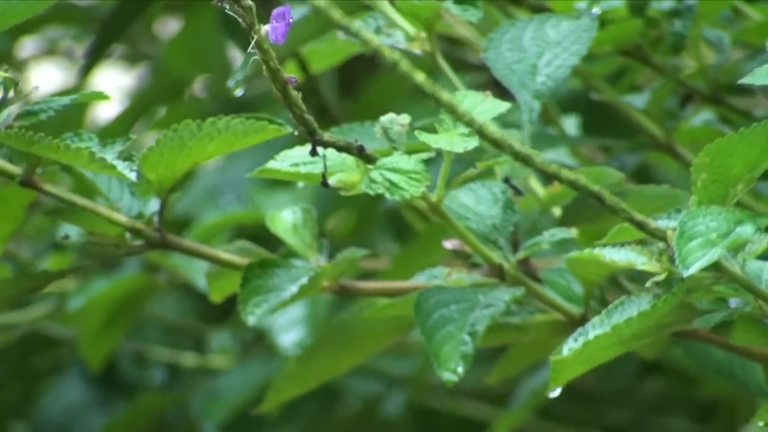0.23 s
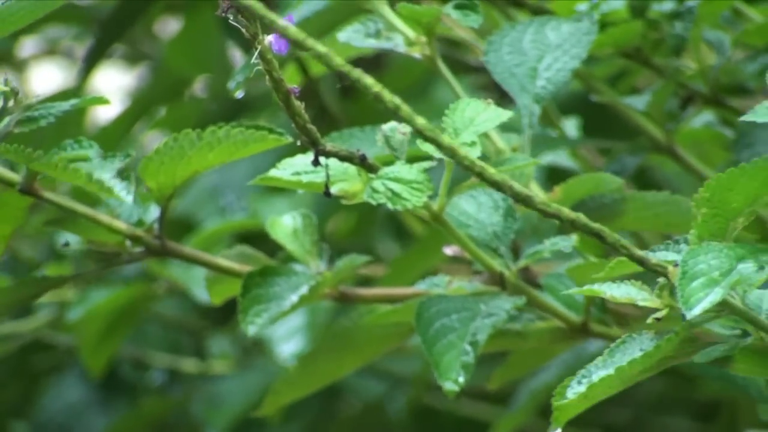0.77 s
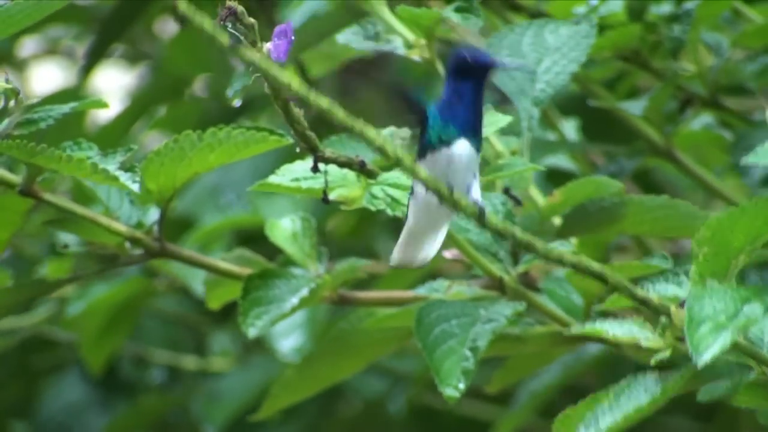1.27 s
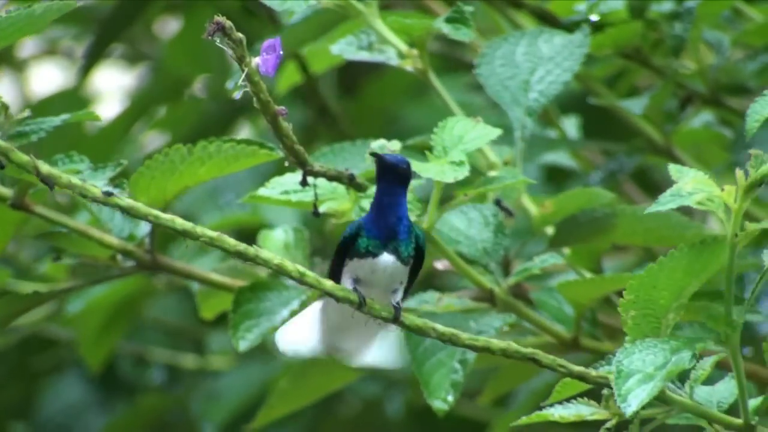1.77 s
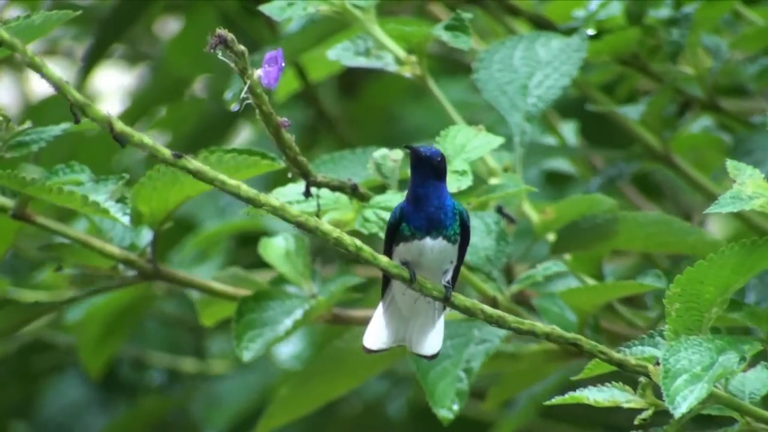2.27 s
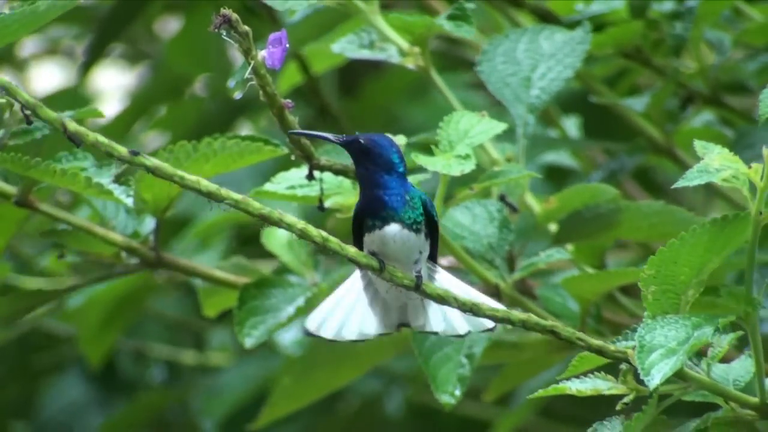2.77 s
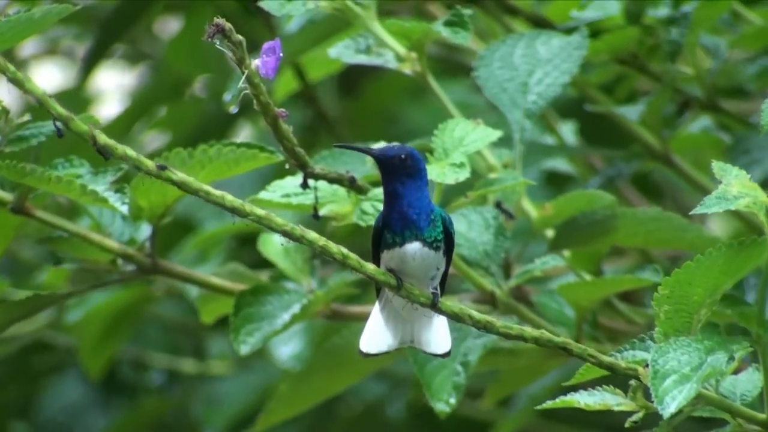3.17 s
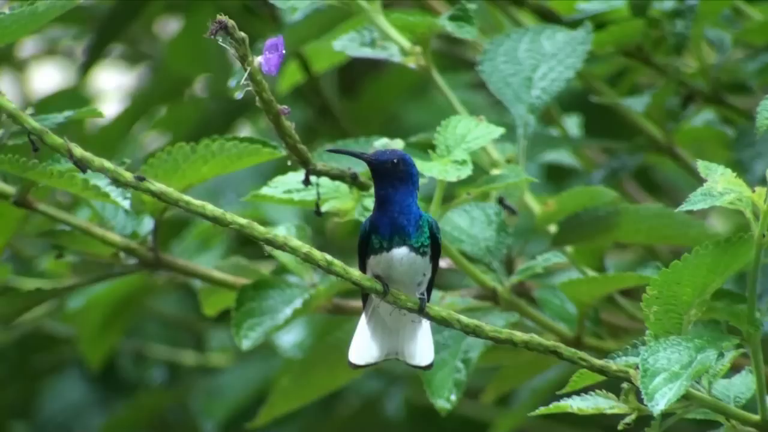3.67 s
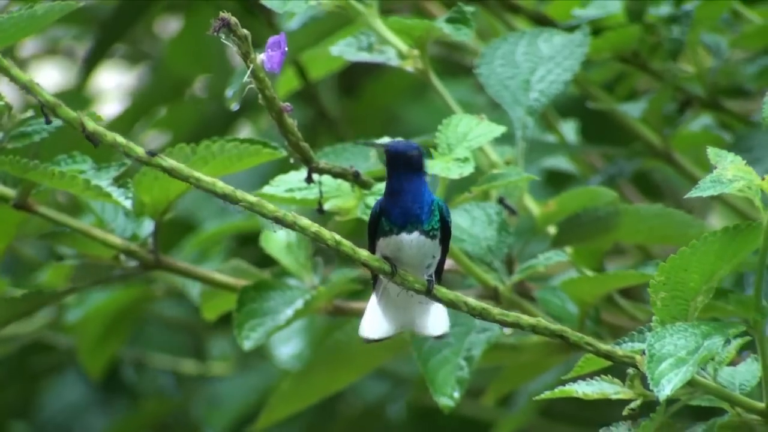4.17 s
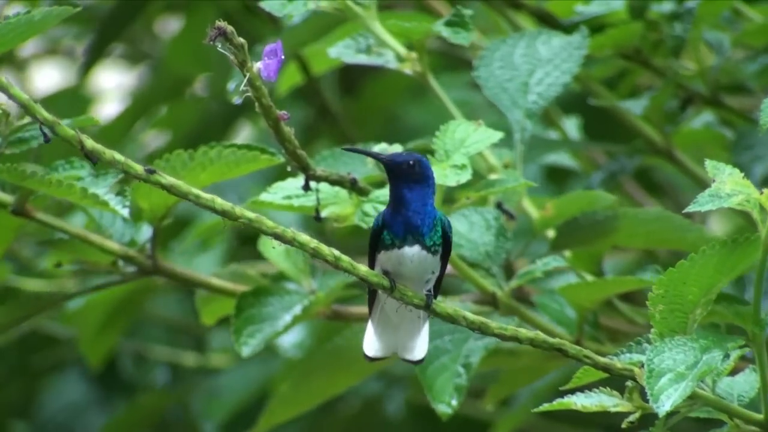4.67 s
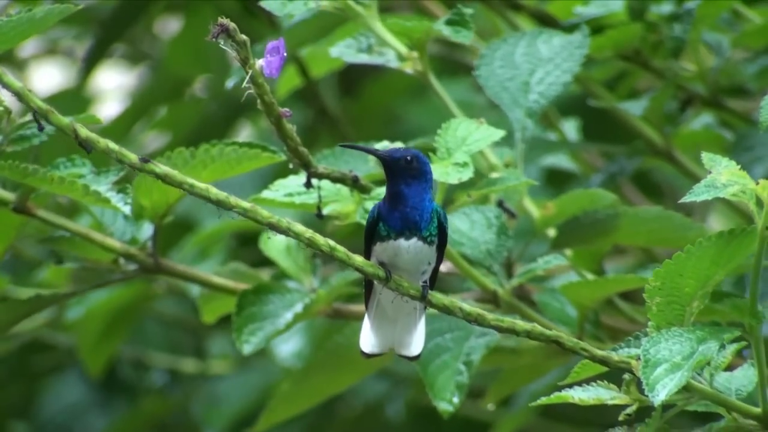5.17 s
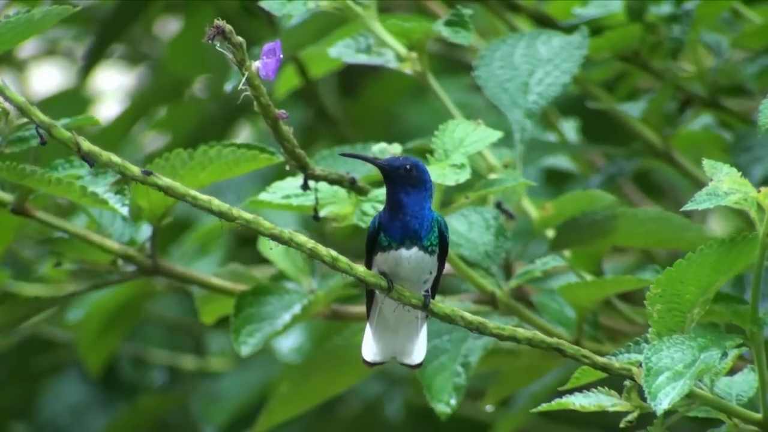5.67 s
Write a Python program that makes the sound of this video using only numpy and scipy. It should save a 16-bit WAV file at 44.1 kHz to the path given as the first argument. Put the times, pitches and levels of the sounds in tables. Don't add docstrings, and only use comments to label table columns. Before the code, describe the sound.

Constant soft rainfall on forest foliage, scattered drop snaps, and occasional short echoing bird whistles over faint distant chirps and thin high seeps.

```python
import sys
import numpy as np
from scipy import signal
from scipy.fft import rfft, irfft, next_fast_len
from scipy.io import wavfile
from scipy.ndimage import uniform_filter1d

SR = 44100
rng = np.random.default_rng(int(sys.argv[2]) if len(sys.argv) > 2 else 0)


def pcm_store(signal):
    levels = np.round(np.clip(np.atleast_2d(signal), -1, 1) * 32767)
    wavfile.write(sys.argv[1], SR, levels.astype(np.int16).T)


def to_linear_factor(level_db):
    exponent = np.asarray(level_db, float) / 20
    return 10 ** exponent


N = 261513

# time_s, body_db, brightness_db (top against body)
SHOWER = [
    (0.0, -44.5, -1.5),
    (0.31, -46, 0),
    (1.68, -46.5, 0),
    (1.9, -46, 0),
    (2.33, -46.5, 0),
    (2.97, -46, 0.5),
    (3.6, -46.5, 1),
    (5.73, -47, 1),
    (5.93, -48.5, 1),
]
# frequency_hz, level_db (per Hz)
RAIN_SPECTRUM = [(210, -47), (350, -11.5), (1210, -0.5), (3130, -0.5), (3720, -5), (5720, -9),
                 (6290, -13.5), (7030, -11), (13300, -31), (15500, -37)]
# frequency_hz, level_db (per Hz)
RUMBLE_SPECTRUM = [(15, -45), (25, -23), (45, -15), (68, -4), (82, -6.5), (125, -3), (200, -2.5), (300, -2),
                   (420, -8), (600, -16), (990, -90)]
# start_s, length_s, level_db
SLURS = [(.002, .06, -52), (.2, .07, -55), (.3, .1, -53), (1.695, .08, -53), (2.99, .065, -54),
         (3.3, .09, -52), (4.475, .09, -51), (4.705, .095, -51), (5.5, .055, -61)]
# start_s, length_s, from_hz, to_hz, level_db
NOTES = [
    (1.82, .06, 3350, 3650, -56),
    (3.697, .04, 5270, 5230, -53.5),
    (3.655, .015, 5050, 5050, -62),
    (4.862, .024, 3550, 3510, -53),
]
# start_s, centre_hz, width_octaves, strength_db
NEAR_DRIPS = [(.068, 14200, .3, -61), (1.112, 15000, .15, -81), (2.758, 3700, .11, -62),
              (4.325, 14300, .25, -81), (4.42, 14500, .2, -83), (4.548, 1200, .16, -65),
              (4.733, 1700, .14, -61), (5.596, 12600, .2, -74)]
# start_s, centre_hz, width_octaves, strength_db
MID_DRIPS = [(.018, 1440, .27, -41), (.621, 10000, 1.1, -56), (.764, 2700, .5, -43.5),
             (1.062, 11500, .7, -55), (1.84, 1630, .51, -38), (2.681, 600, .33, -58), (2.83, 5200, .1, -52),
             (2.875, 8400, .76, -47), (3.037, 6500, .46, -43), (3.037, 9900, .2, -59),
             (3.751, 895, .3, -54), (3.862, 12000, .7, -64), (3.912, 1560, .49, -35),
             (4.09, 10000, .55, -52), (4.561, 6000, .4, -56), (4.964, 3000, .12, -46),
             (5.001, 13500, .3, -67), (5.023, 1595, .17, -44.5), (5.292, 11500, .6, -61),
             (5.822, 4300, .98, -40.5), (.347, 11000, .8, -62), (.424, 11500, .35, -57),
             (1.772, 6500, .35, -52), (3.007, 1790, .18, -49), (3.173, 12500, .4, -64),
             (4.434, 171, .5, -68), (5.054, 7500, .51, -51), (5.207, 12000, .6, -52.5),
             (3.035, 13500, .45, -56)]
# start_s, centre_hz, width_octaves, strength_db
FAR_DRIPS = [(.004, 4800, .45, -46), (1.033, 1710, .6, -44), (1.335, 13200, .45, -57),
             (1.336, 4500, 1.01, -44), (1.659, 4480, .3, -47), (1.676, 8900, .5, -50),
             (1.745, 746, .18, -52.5), (2.305, 10500, .9, -58), (3.101, 2400, .22, -43),
             (3.26, 7460, .6, -49), (3.595, 8500, .54, -54), (4.488, 12500, .4, -67),
             (4.62, 1250, .64, -43.5), (5.265, 6500, .5, -51), (5.814, 11000, .7, -55)]
# start_s, length_s, from_hz, to_hz, level_db
PLOPS = [
    (.016, 0.024, 1504, 1425, -42.5),
    (3.003, .024, 1795, 1816, -43),
    (3.915, .035, 1385, 1860, -48),
    (4.628, 0.024, 1100, 1505, -46),
    (4.732, .02, 1650, 1750, -47),
    (2.68, 0.056, 592, 640, -58),
]
# centre_s, low_hz, high_hz, level_db
PUFFS = [(0.576, 8270.0, 10340.0, -66.6), (0.577, 13180.0, 14380.0, -81.1),
         (0.949, 10340.0, 11630.0, -75.4), (1.157, 5130, 6290.0, -55.2), (1.159, 10420.0, 11630.0, -75.2),
         (1.205, 12490.0, 13700.0, -81.2), (1.299, 5680.0, 6890.0, -60.6), (1.299, 9650.0, 10940.0, -73.3),
         (1.601, 5680.0, 6890.0, -60), (1.603, 9040.0, 10340.0, -68.8), (2.552, 4130.0, 5140, -56),
         (2.971, 5680.0, 6890.0, -62.6), (3.061, 13870.0, 15070.0, -77.6), (4.04, 11110.0, 13010.0, -76.3)]
# start_s, length_s, from_hz, to_hz, level_db
SEEPS = [(.95, .08, 8300, 8620, -62), (1.075, .11, 8550, 8450, -64), (2.29, .07, 8700, 8500, -61),
         (2.38, .07, 8600, 8400, -69), (3.73, .06, 8550, 8400, -65), (4.905, .03, 8500, 8500, -59),
         (5.06, .06, 8500, 8400, -64)]
# climb_start_s, crest_s, fall_s, crest_hz, level_db
WHISTLES = [
    (1.817, .056, .085, 2770, -38),
    (4.928, .078, .015, 2770, -36),
    (5.477, .052, .09, 2660, -35.5),
]
# time_s, pitch_hz, level_db
CHIP = [
    (4.883, 3450, -46),
    (4.893, 4450, -44.5),
    (4.905, 5510, -44.5),
    (4.914, 6150, -50),
]
# centre_hz, width_hz, depth_db
HOUSING = [(5100, 104, -1.5), (7680, 240, -2.5), (10940, 390, -2), (12550, 320, -1.5), (14100, 500, -1.5)]

RUMBLE_DB, CUTOFF_HZ = -66.3, 15690
SLUR_FROM_HZ, SLUR_TO_HZ = 3040, 3640
NEAR_SNAP_DB, MID_SNAP_DB, FAR_SNAP_DB = 27, 13.6, 1.5
NEAR_TAIL_S, MID_TAIL_S, FAR_TAIL_S = .3, .53, .56
TAIL_KNEE_DB, TAIL_LOSS_S_PER_DB, SNAP_LOSS = -47, .028, .55
NOTE_WOBBLE_HZ, SEEP_WOBBLE_HZ, WHISTLE_WOBBLE_HZ = 38, 130, 24
LEAD_S, LEAD_FROM_HZ, LEAD_TO_HZ = .04, 2220, 2320
CLIMB_S, CLIMB_TO_HZ, FALL_HZ_PER_S = .044, 2640, 8800
LEAD_DB, CLIMB_DB, ARRIVE_DB, CREST_DB, FALL_DB, END_DB = -11, -5.5, -1.5, 1.6, -2.6, -7.5


def rms_one(x):
    return x / np.sqrt(np.mean(x ** 2) + 1e-20)


def at_hz(points, hz):
    point_hz, point_db = np.array(points).T
    return np.interp(np.log(hz + 1), np.log(point_hz), point_db)


def drift(rate_hz):
    r = np.exp(-80 * np.pi * rate_hz / SR)
    chance = rng.standard_normal(N // 40 + 2002)
    slow = signal.lfilter([1], [1, -2 * r, r * r], chance)[2000:]
    return np.interp(np.arange(N) / 40, np.arange(len(slow)), rms_one(slow))


def coloured(x, spectrum):
    gain = to_linear_factor(at_hz(spectrum, np.fft.rfftfreq(len(x), 1 / SR)))
    return rms_one(irfft(rfft(x) * gain, len(x)))


def scattered(length, t60, build_s):
    t = np.arange(length) / SR
    build = 1 - np.exp(-t / max(build_s, 1e-4))
    return rng.standard_normal(length) * build * to_linear_factor(-60 * t / max(t60, .02))


def drop_sizes(count, spread_db):
    return to_linear_factor(spread_db * np.minimum(rng.exponential(1, count), 4)) * rng.choice([-1, 1], count)


def rain(patchy_db, gust_db, ticks_per_s, tick_db, spread_db):
    time_s, *levels = np.transpose(SHOWER)
    body_db, bright_db = (np.interp(np.arange(N) / SR, time_s, level) for level in levels)
    size = next_fast_len(N)
    ticks = drop_sizes(size, spread_db) * (rng.random(size) < ticks_per_s / SR)
    leaf = np.r_[1, .05 * scattered(4096, .15, .004)]
    ticks = rms_one(signal.fftconvolve(ticks, leaf)[:size])
    treble = signal.butter(1, 6000, "high", fs=SR, output="sos")
    bright = signal.sosfilt(treble, ticks)
    wide = rfft(coloured(rng.standard_normal(size) + to_linear_factor(tick_db) * bright, RAIN_SPECTRUM))
    octave = np.log2(np.fft.rfftfreq(size, 1 / SR) / 500 + 1e-9)
    gust = drift(8.0)
    out = 0
    for k in range(11):
        share = np.clip(1 - np.abs(np.clip(2 * octave, 0, 10) - k), 0, 1)
        swell_db = k / 10 * (bright_db + gust_db * gust) + patchy_db * drift(14.0)
        out = out + to_linear_factor(swell_db) * irfft(wide * share, size)[:N]
    return to_linear_factor(body_db + 4.5) * out


def rumble():
    return to_linear_factor(RUMBLE_DB) * coloured(rng.standard_normal(next_fast_len(N)), RUMBLE_SPECTRUM)[:N]


def patter(per_s, cycles, spread_db, level_db):
    sizes = np.clip(drop_sizes(N, spread_db), -3.3, 3.3)
    born = rng.random(N) < per_s / SR
    dealt = rng.integers(0, 14, N)
    out = 0
    for k, hz in enumerate(np.geomspace(950, 4400, 14)):
        r, w = to_linear_factor(-60 * hz / (cycles * SR)), 2 * np.pi * hz / SR
        hits = sizes * born * (dealt == k) + 1e-18
        out = out + signal.lfilter([0, np.sin(w)], [1, -2 * r * np.cos(w), r * r], hits)
    thin = signal.butter(4, 500, "high", fs=SR, output="sos")
    return to_linear_factor(level_db) * rms_one(signal.sosfilt(thin, out))


def forest(x, wet_db, t60, build_s, echo_s, echo_db):
    answer = scattered(SR, t60, build_s)
    answer = to_linear_factor(wet_db) * answer / np.sqrt(np.sum(answer ** 2))
    answer[0] = 1
    trunks = np.round((echo_s + .004 * rng.standard_normal(3) * [0, 1, 1]) * SR).astype(int)
    answer[np.maximum(trunks, 1)] += to_linear_factor(echo_db - np.array([1.2, 8, 11]))
    return signal.fftconvolve(x, answer)[:N]


def sing(rows, overtone_db, wobble_hz):
    s, hz, level_db = np.transpose(rows)
    t = np.arange(s[0], s[-1], 1 / SR)
    smooth = lambda v: uniform_filter1d(v, size=300, mode="nearest")
    wobble = wobble_hz * rms_one(smooth(rng.standard_normal(SR // 2)))[:len(t)]
    phase = 2 * np.pi * np.cumsum(smooth(np.interp(t, s, hz)) + wobble) / SR
    tone = np.sin(phase) + to_linear_factor(overtone_db) * np.sin(2 * phase)
    ends = np.clip(np.minimum(t - s[0], s[-1] - t) / 0.004, 0, 1)
    level = to_linear_factor(smooth(np.interp(t, s, level_db)))
    out, at = np.zeros(N), round(s[0] * SR)
    out[at:at + len(t)] = np.sqrt(2) * ends * level * tone
    return out


def notes(table, wobble_hz):
    out = np.zeros(N)
    for s, length, from_hz, to_hz, db in table:
        bend = (s + .55 * length, from_hz + .7 * (to_hz - from_hz), db)
        out += sing([(s, from_hz, db), bend, (s + length, to_hz, db)], -22, wobble_hz)
    return out


def far_callers():
    slurs = [(s, length, SLUR_FROM_HZ, SLUR_TO_HZ, db) for s, length, db in SLURS]
    calls = to_linear_factor(1.6) * notes(NOTES + slurs, NOTE_WOBBLE_HZ)
    return forest(calls, wet_db=-2.5, t60=.6, build_s=.006, echo_s=.05, echo_db=-13)


def drips(table, snap_db, tail_s):
    out, size, lead = np.zeros(N + SR), SR // 2, 64
    slope = to_linear_factor(at_hz(RAIN_SPECTRUM, np.fft.rfftfreq(size, 1 / SR)))
    for s, hz, octaves, db in table:
        edges = np.clip(hz * 2 ** (np.array([-.5, .5]) * max(octaves, .05)), 50, .45 * SR)
        band = signal.butter(2, edges, "band", fs=SR, output="sos")
        heavy_db = max(db - TAIL_KNEE_DB, 0)
        t60 = tail_s - TAIL_LOSS_S_PER_DB * heavy_db
        click = np.eye(1, size, lead)[0] + 1e-18
        both = np.array([click, np.roll(scattered(size, t60, .004), lead)])
        tick, tail = irfft(rfft(signal.sosfilt(band, both)) * slope, size)
        snap = to_linear_factor(db + snap_db - SNAP_LOSS * heavy_db) * tick / np.abs(tick).max()
        at = round(s * SR) - lead
        out[at:at + size] += snap + to_linear_factor(db) * tail / np.sqrt(np.sum(tick ** 2))
    return out[:N]


def plops():
    return notes(PLOPS, NOTE_WOBBLE_HZ)


def puffs():
    out, size = np.zeros(N), 2048
    for s, low_hz, high_hz, db in PUFFS:
        band = signal.butter(6, [low_hz, high_hz], "band", fs=SR, output="sos")
        noise = rms_one(signal.sosfilt(band, rng.standard_normal(size)))
        at = round(s * SR) - size // 2
        out[at:at + size] += to_linear_factor(db) * noise * signal.windows.kaiser(size, 4.5)
    return out * [[1], [-1]]


def seeper():
    seeps = to_linear_factor(-1.5) * notes(SEEPS, SEEP_WOBBLE_HZ)
    return forest(seeps, wet_db=3, t60=.5, build_s=.006, echo_s=.02, echo_db=-6)


def whistle(s, crest_s, fall_s, crest_hz, db):
    top, over = s + CLIMB_S, s + CLIMB_S + crest_s
    fallen = lambda share: (over + share * fall_s, crest_hz - FALL_HZ_PER_S * share * fall_s)
    rows = [(s - LEAD_S, LEAD_FROM_HZ, db + LEAD_DB),
            (s, LEAD_TO_HZ, db + CLIMB_DB),
            (top, CLIMB_TO_HZ, db + ARRIVE_DB),
            (top + .6 * crest_s, crest_hz, db - 1.4),
            (over, crest_hz, db + CREST_DB),
            (*fallen(.3), db + FALL_DB),
            (*fallen(.8), db + FALL_DB - 1.5),
            (*fallen(1), db + END_DB)]
    return sing(rows, -45, WHISTLE_WOBBLE_HZ)


def whistler():
    whistles = to_linear_factor(-4.6) * sum(whistle(*row) for row in WHISTLES)
    return forest(whistles, wet_db=1, t60=.92, build_s=.011, echo_s=.057, echo_db=-2.5)


def chipper():
    chip = sing(CHIP, -45, NOTE_WOBBLE_HZ)
    return forest(chip, wet_db=10, t60=.95, build_s=.011, echo_s=.022, echo_db=-3)


def scene():
    hiss = rain(patchy_db=.7, gust_db=.74, ticks_per_s=330, tick_db=-4.8, spread_db=4.5)
    pattering = patter(per_s=120, cycles=32, spread_db=3.46, level_db=-57.5)
    drops = forest(pattering, wet_db=-1, t60=.34, build_s=.0058, echo_s=.018, echo_db=-13.5)
    leaves = (drips(NEAR_DRIPS, NEAR_SNAP_DB, NEAR_TAIL_S)
              + drips(MID_DRIPS, MID_SNAP_DB, MID_TAIL_S)
              + drips(FAR_DRIPS, FAR_SNAP_DB, FAR_TAIL_S))
    birds = far_callers() + seeper() + whistler() + chipper()
    return np.tile(hiss + rumble() + drops + leaves + plops() + birds, (2, 1))


def low_pass(x):
    return signal.sosfilt(signal.butter(12, 15690, fs=SR, output="sos"), x)


def record(dry):
    size = next_fast_len(N + 2048)
    hz = np.fft.rfftfreq(size, 1 / SR)
    colour_db = sum(db * np.exp(-.5 * ((hz - centre_hz) / width_hz) ** 2)
                    for centre_hz, width_hz, db in HOUSING)
    heard = irfft(rfft(dry, size) * to_linear_factor(colour_db) * (hz < CUTOFF_HZ), size)[:, :N]
    return low_pass(heard + puffs())


dry = scene()
out = record(dry)
pcm_store(out)
```